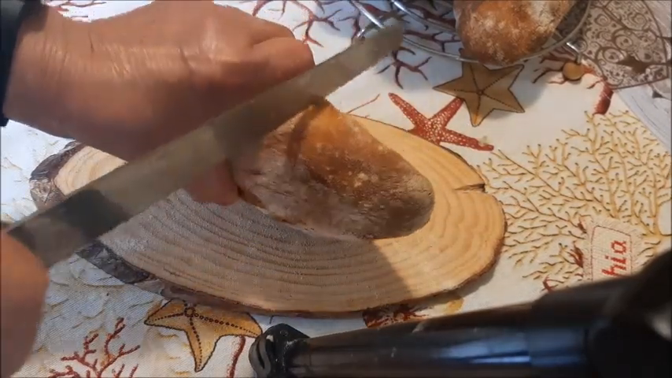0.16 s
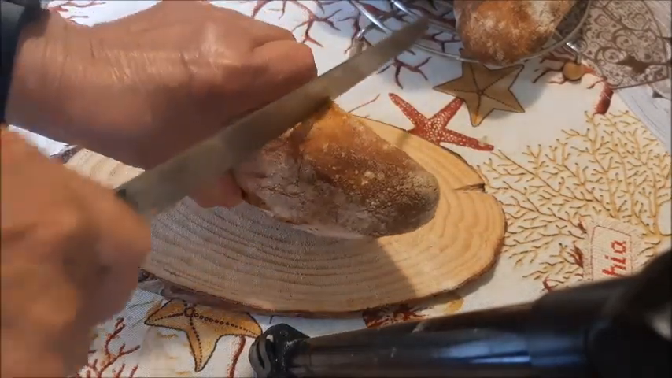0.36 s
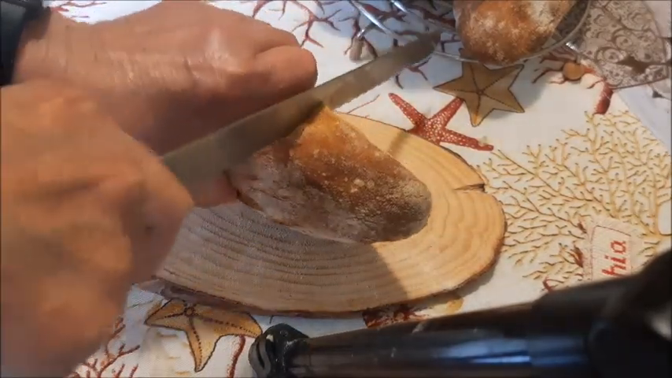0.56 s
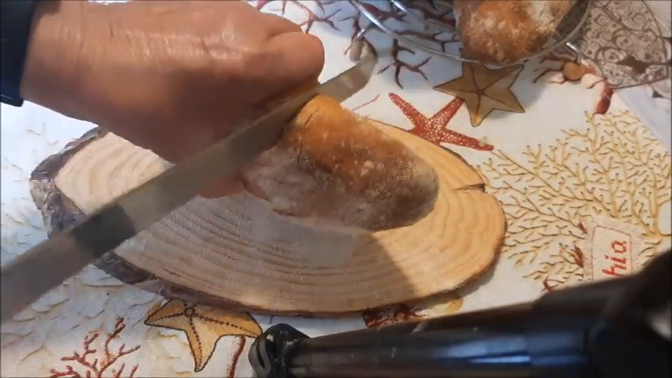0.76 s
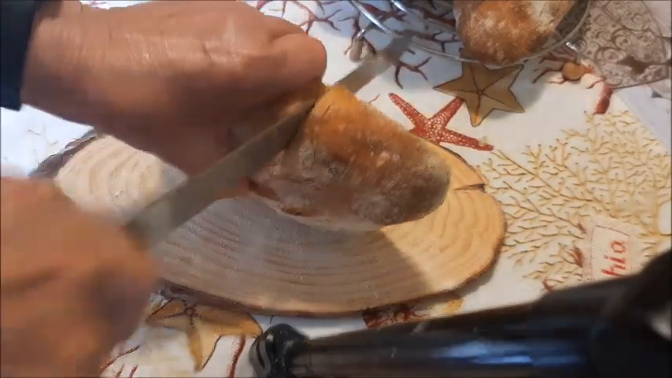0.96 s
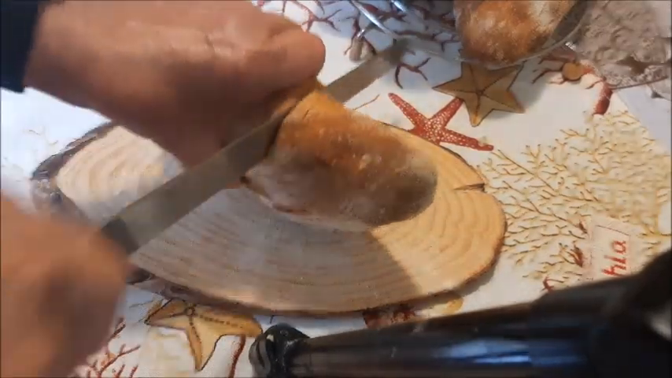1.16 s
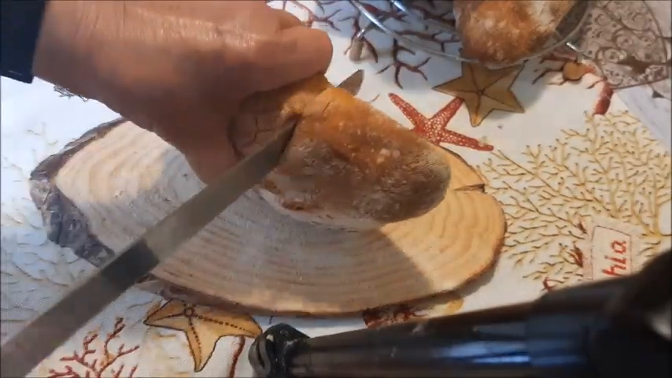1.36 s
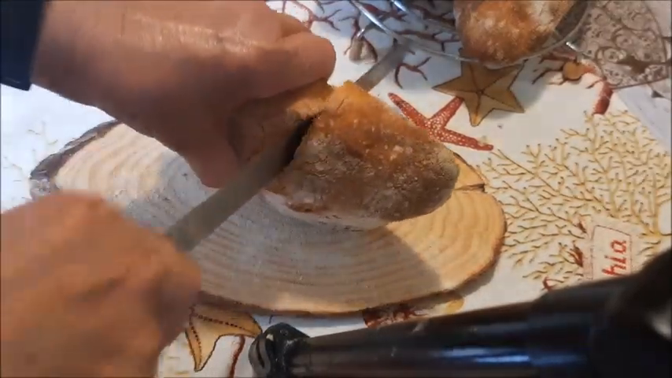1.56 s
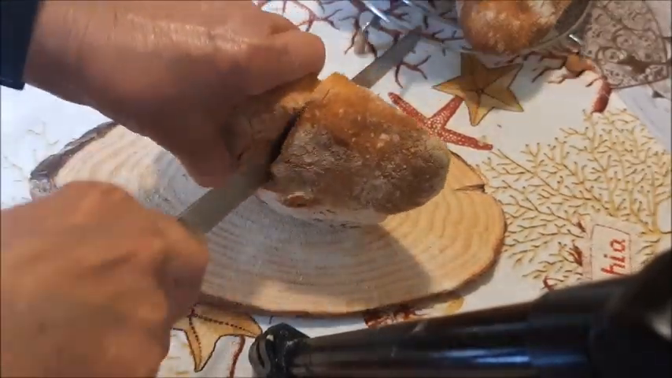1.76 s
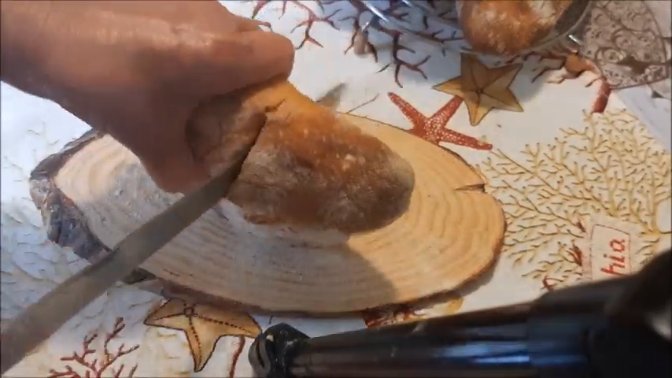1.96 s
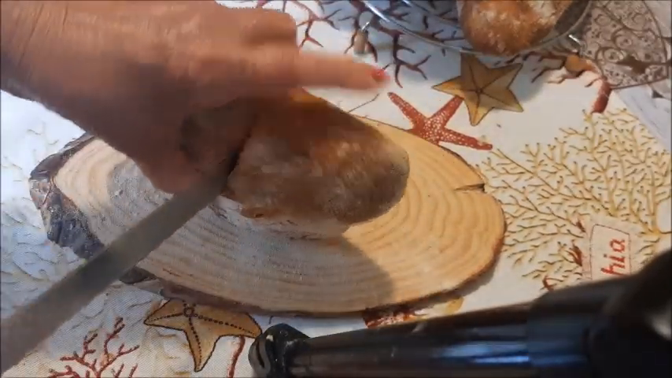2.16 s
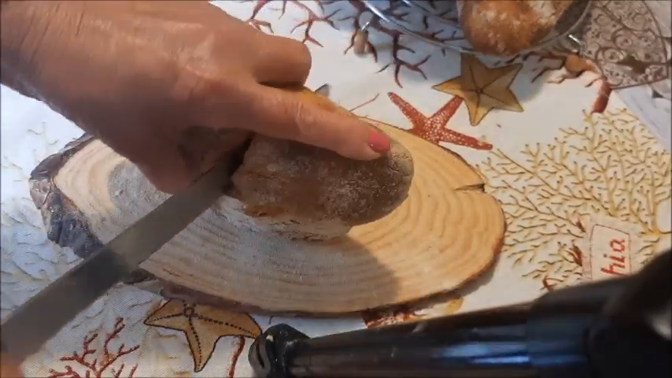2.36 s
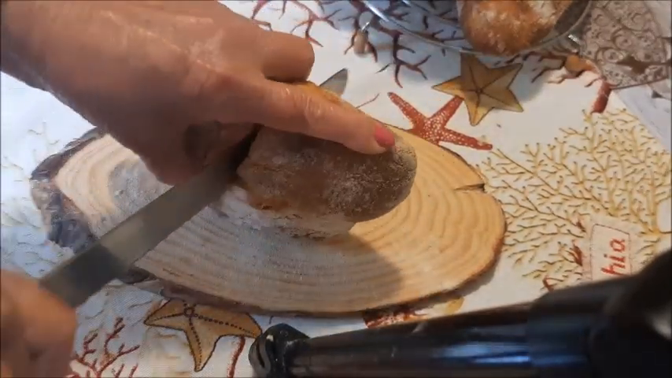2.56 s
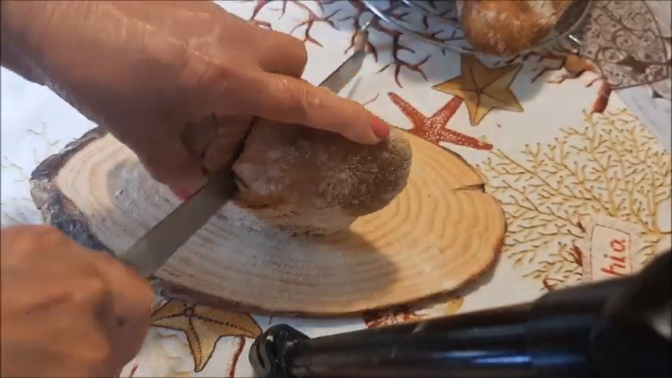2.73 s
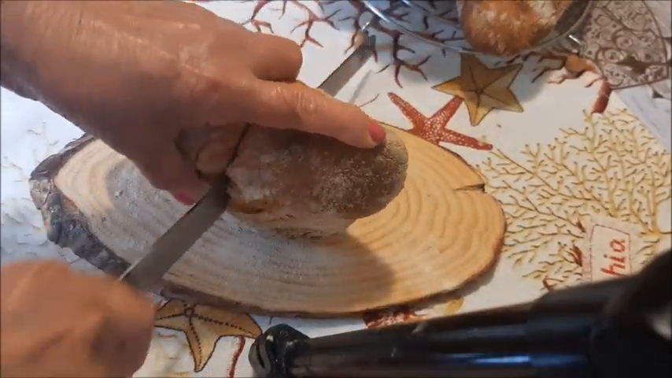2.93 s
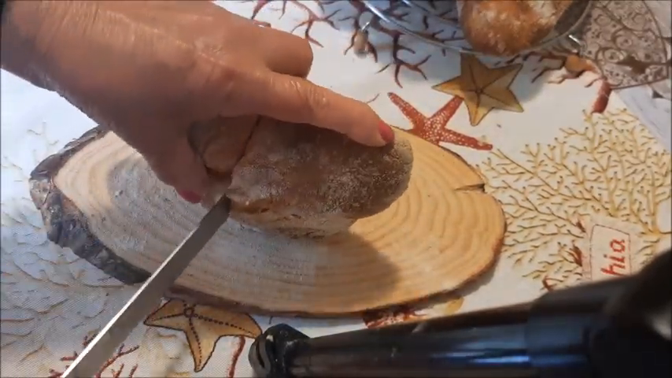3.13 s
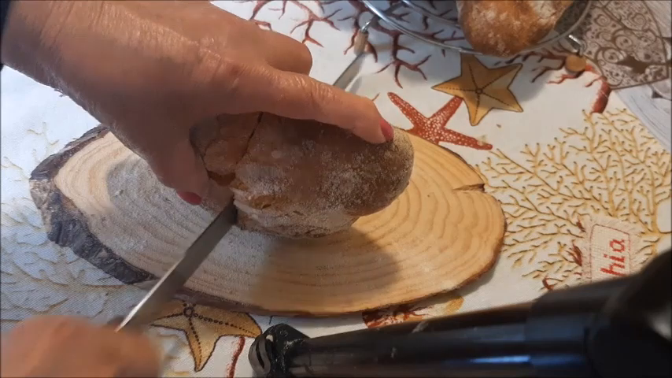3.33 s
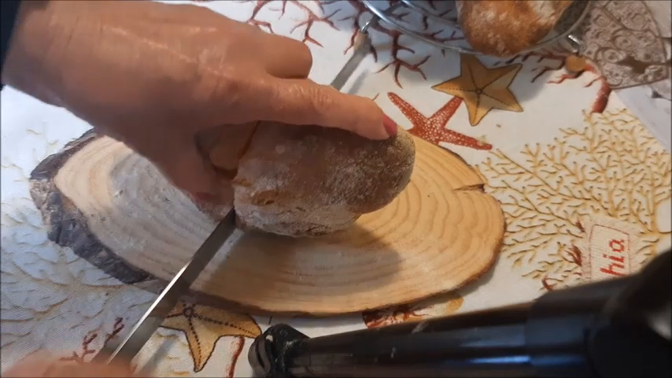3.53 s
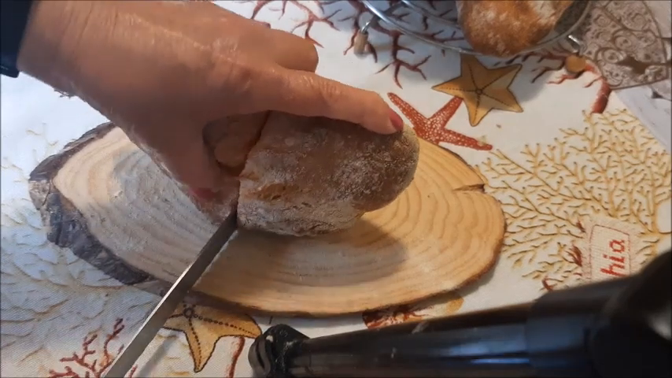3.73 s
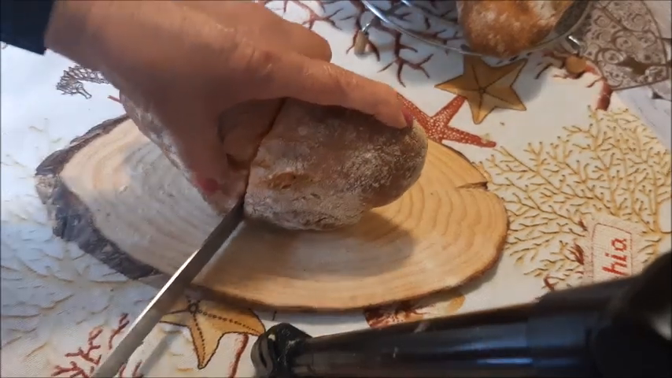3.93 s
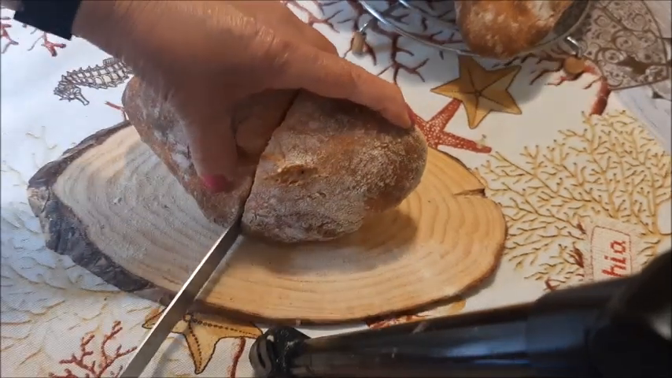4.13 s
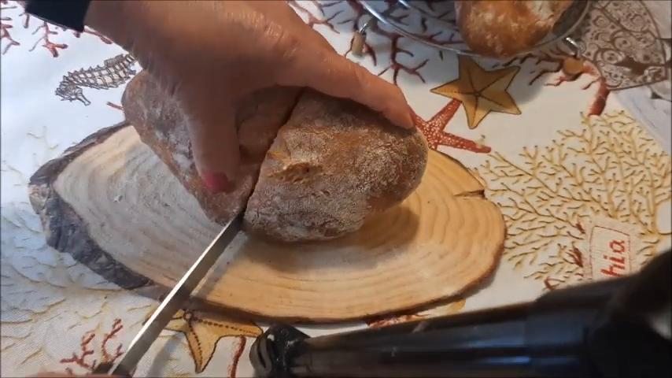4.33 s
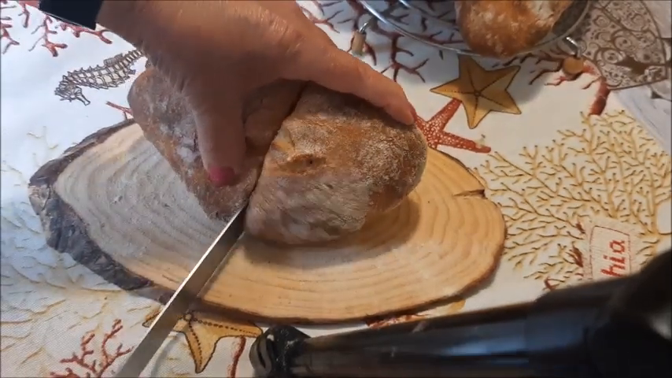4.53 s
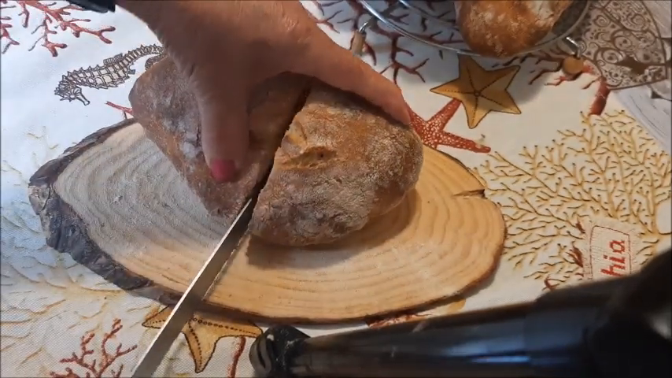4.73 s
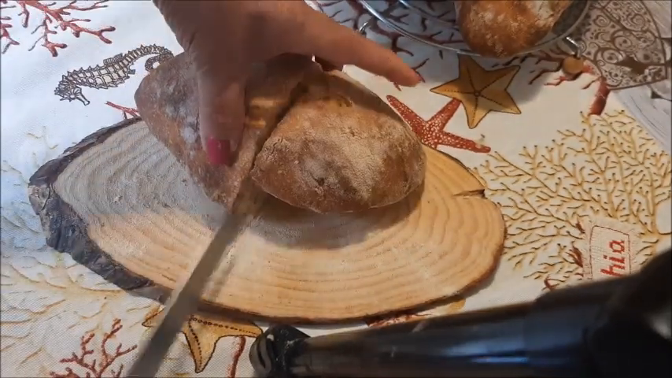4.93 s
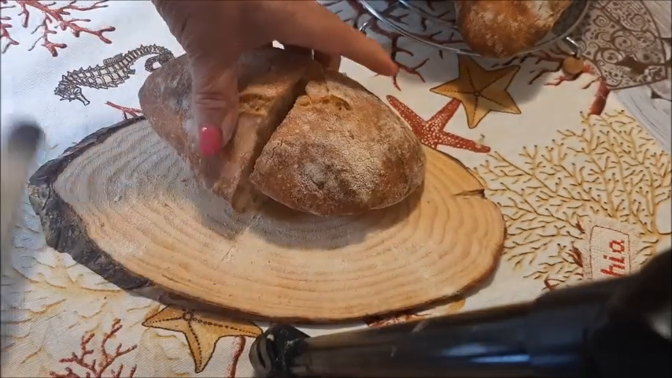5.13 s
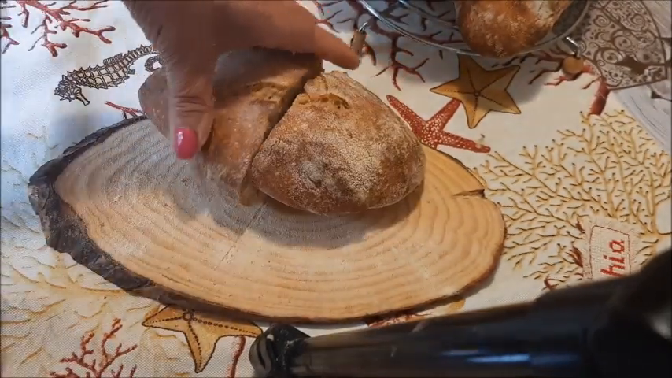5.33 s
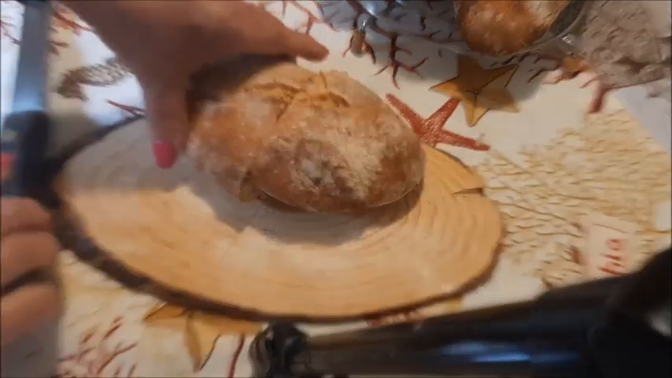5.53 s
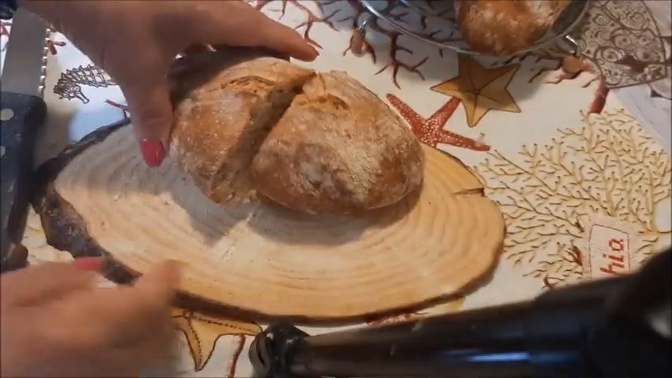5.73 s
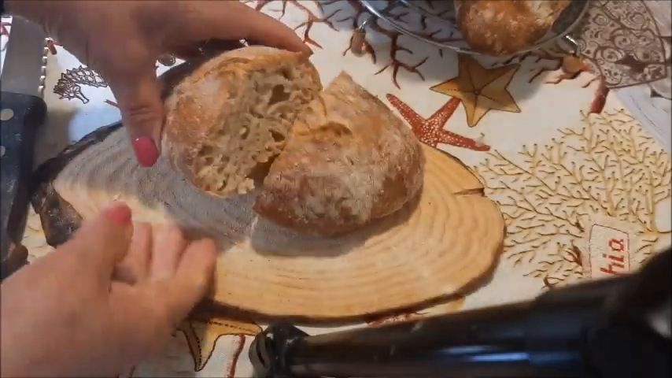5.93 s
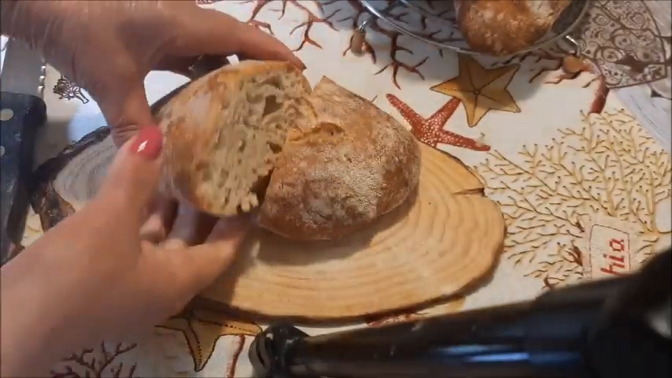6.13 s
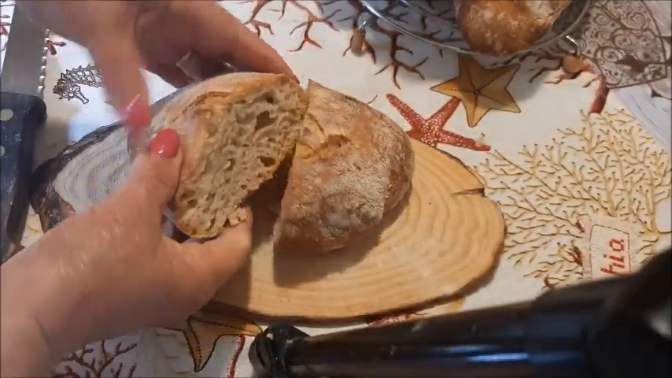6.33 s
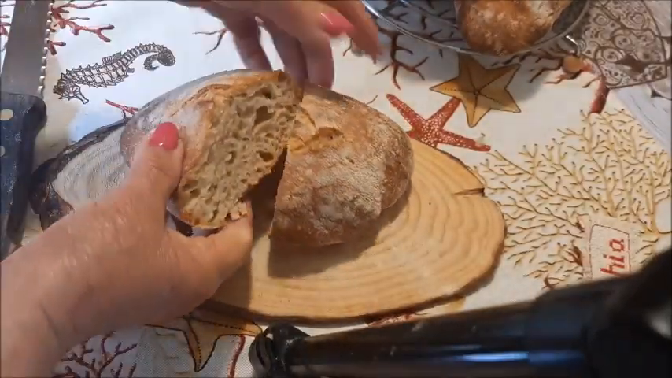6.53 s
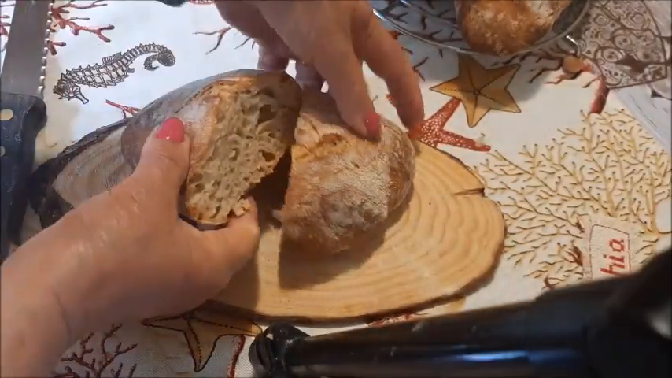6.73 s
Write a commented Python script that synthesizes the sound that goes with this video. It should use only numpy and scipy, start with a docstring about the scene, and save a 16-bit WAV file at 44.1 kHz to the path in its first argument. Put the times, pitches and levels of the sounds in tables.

```python
"""Close by in a kitchen, a serrated knife saws through a crusty roll on a wooden board.
Its teeth catch and crack the crust and shake loaf and board; the last strokes groan on the wood.
Fingers brush the bread, then the knife is put down on the cloth-covered table with a thud.
Last, the fingers turn the cut halves, rustling over the faint hush of the room."""
import sys
import numpy as np
from scipy import signal
from scipy.fft import rfft, irfft
from scipy.io import wavfile
from scipy.ndimage import uniform_filter1d

SR = 44100
rng = np.random.default_rng(int(sys.argv[2]) if len(sys.argv) > 2 else 0)


def wav_out(sig):
    """Save sig, one row per channel (or a flat mono array), as 16-bit PCM at SR to the path in sys.argv[1]."""
    wavfile.write(sys.argv[1], SR, np.round(np.clip(np.atleast_2d(sig).T, -1, 1) * 32767).astype(np.int16))


N = 298998

# large pieces of crust snapping: t/s, crack level/dB, knock level/dB
SNAPS = [(0.1786, -31, -46), (0.2342, -24.5, -39.5), (0.2687, -33, -42.5), (0.4581, -24.5, -45),
         (0.5298, -44, -33), (0.6484, -27, -52.5), (0.748, -17, -46), (0.7626, -33, -35),
         (0.7976, -31, -41), (0.9546, -27.5, -43), (1.0587, -23, -38), (1.1078, -25, -36.5),
         (1.1347, -21, -37.5), (1.2017, -33.5, -59), (1.314, -27, -45), (1.4627, -30, -43),
         (1.484, -16.5, -41.5), (1.51, -29, -35), (1.5301, -27.5, -36.5), (1.5787, -22.5, -36),
         (1.6578, -19, -53), (1.704, -32, -63), (1.7157, -11.5, -33.5), (1.8855, -23.5, -43),
         (2.1024, -39, -51), (2.37, -24, -42.5), (2.387, -31.5, -41), (2.4558, -32, -38),
         (2.474, -20.5, -37.5), (2.6217, -25, -45), (2.6357, -16.5, -37.5), (2.663, -26, -40.5),
         (2.6743, -18, -43), (2.7324, -32, -40), (2.7716, -23, -44), (2.7859, -27, -33.5),
         (2.835, -26, -34), (2.8631, -34, -38), (3.016, -30, -50.5), (3.4175, -31.5, -37),
         (3.4778, -26, -36), (3.57, -31, -58), (3.6206, -30, -42), (3.7004, -27, -52), (3.8899, -30.5, -46),
         (4.0921, -42, -51), (4.5819, -24.5, -36.5)]
# ringing notes of board and table: f/Hz, level/dB, time to fade by 60 dB/s
BOARD_NOTES = [(87, 8, 0.24), (106, 2, 0.53), (144.2, -5.5, 0.35), (182.5, 5.5, 0.09), (252, -6, 0.14),
               (285, -18.5, 0.059), (380, -6.5, 0.25), (571, -1.5, 0.092)]
# tone of the loaf's dull body: f/Hz, level/dB
LOAF_TONE = [(90, -27.5), (150, 0), (195, -3), (300, -0.5), (450, -2), (700, -5.5), (950, -13.5),
             (2000, -47.5)]
# tone of teeth rasping in the top crust: f/Hz, level/dB
RASP_TONE = [(300, -24), (650, 3), (900, -0.5), (1200, -1), (1600, 2), (2200, -1.5), (2800, -3),
             (3600, -11.5), (6000, -17), (16000, -39)]
# bright tone of breaking crust: f/Hz, level/dB
CRUST_TONE = [(600, -22), (1800, -3), (2800, -1), (4200, 1), (5500, -4), (7500, -2), (11000, 1.5),
              (13000, 5), (16000, 2.5)]


def amp(db):
    """Turn decibels into a gain to multiply by."""
    return 10 ** (np.asarray(db) / 20)


def unit(x):
    """Scale to energy 1."""
    return x / np.sqrt(np.sum(x ** 2, axis=-1, keepdims=True) + 1e-20)


def at_hz(points, hz):
    """Read between the rows of a table, with octaves evenly spaced."""
    f, value = np.transpose(points)
    return np.interp(np.log(np.maximum(hz, 1)), np.log(f), value)


def response(tone, size=4096):
    """What a click becomes when given this tone (a minimum-phase impulse response)."""
    gains = amp(at_hz(tone, np.arange(size // 2 + 1) * SR / size))
    cepstrum = irfft(np.log(gains))
    # folding the second half onto the first puts all the sound after the click
    cepstrum[1:size // 2] *= 2
    cepstrum[size // 2 + 1:] = 0
    return irfft(np.exp(rfft(cepstrum)))


def through(x, impulse):
    """Pass a sound through something whose answer to a click is known."""
    return signal.oaconvolve(x, impulse)[:N]


def colour(x, tone):
    """Give a sound a tone, using a filter of energy 1."""
    return through(x, unit(response(tone)))


def ringing(notes):
    """A struck object's answer to a click: fading sine waves of alternating sign."""
    t = np.arange(SR // 2) / SR
    return unit(sum((-1) ** k * amp(db - 60 * t / fade_s) * np.sin(2 * np.pi * hz * t)
                    for k, (hz, db, fade_s) in enumerate(notes)))


def even(x, span_s):
    """Hold the average level at 1 while keeping the fine roughness."""
    power = uniform_filter1d(x ** 2, size=max(int(span_s * SR), 2))
    power = uniform_filter1d(power, size=max(int(span_s * SR / 2), 2))
    return x / np.sqrt(np.maximum(power, 1e-12))


def grains(per_s, spread_db):
    """Random clicks, many small and a few large."""
    at = np.flatnonzero(rng.random(N) < per_s / SR)
    size, sign = rng.random((2, N))[:, at]
    clicks = np.zeros(N)
    clicks[at] = amp(spread_db * np.minimum(-np.log1p(-size), 4)) * np.sign(sign - .5)
    return clicks


def crumble(clicks, decay_s, share):
    """Each click sets off a short, fading shower of tiny ones."""
    decay = np.exp(-1 / (decay_s * SR))
    energy = signal.lfilter([1 - decay], [1, -decay], clicks ** 2 + 1e-18)
    return clicks + share * np.sqrt(energy) * even(grains(per_s=14000, spread_db=3.5), span_s=0.014)


def strikes(events):
    """One click for each row of time and level."""
    times, levels_db = np.transpose(events)
    clicks = np.zeros(N)
    clicks[np.round(times * SR).astype(int)] = amp(levels_db)
    return clicks


def glide(start, rise, fall):
    """Speed of one hand movement, 0-1: it speeds up from rest and slows to rest again."""
    roundness = 0.46  # 0 is a sharp jerk, 1 a smooth swing
    times = start + np.cumsum([0, rise, fall])
    first, last = np.clip((times[[0, 2]] * SR).astype(int), 0, N)
    ramp = np.interp(np.arange(first, last) / SR, times, [0, 1, 0])
    speed = np.zeros(N)
    speed[first:last] = ramp + roundness * (np.sin(np.pi / 2 * ramp) - ramp)
    return speed


def friction(moves, levels_db, power, lag_s=0):
    """Gain of the rubbing in a series of movements: it grows as speed raised to a power."""
    energy = np.zeros(N)
    for (start, rise, fall, *_), db in zip(moves, levels_db):
        energy += (amp(db) * glide(start + lag_s, rise, fall) ** power) ** 2
    return np.sqrt(energy)


def reflections(length_s, envelope, weight, count):
    """Stereo echoes of a click, made of noise bands that each fade in their own way."""
    # how alike the echo is left and right: f/Hz, likeness/0-1
    likeness = [(120, 1), (300, 0.82), (600, 0.26), (1200, 0.19), (16000, 0)]
    t = np.arange(int(SR * length_s)) / SR
    edges = np.geomspace(40, 19000, num=13)
    echo = 0
    for low, high in zip(edges, edges[1:]):
        hz = np.sqrt(low * high)
        alike = at_hz(likeness, hz)
        mid, side = rng.standard_normal((2, count, 1, len(t)))
        noise = np.sqrt(1 + alike) * mid + np.sqrt(1 - alike) * side * [[1], [-1]]
        bandpass = signal.butter(2, [low, high], "band", fs=SR, output="sos")
        band = signal.sosfilt(bandpass, noise * envelope(t, hz))
        echo = echo + np.sqrt(2 * (high - low) / SR) * weight(hz) * unit(band)
    return echo


def kitchen(x, near_db, room_db, pan_db, lead_ms):
    """A sound arrives directly, then bounces off board, hands and table, then echoes round the room."""
    # how long the room rings: f/Hz, time to fade by 60 dB/s
    room_fade = [(80, 0.28), (400, 0.49), (1500, 0.51), (4000, 0.53), (8000, 0.096), (16000, 0.13)]
    at = np.arange(N)
    right = np.interp(at - np.round(lead_ms * SR / 1000), at, x)
    out = np.array([x, right])
    # small surfaces scatter only the high notes
    paths = reflections(.02, envelope=lambda t, hz: np.exp(-t / 0.0027) * (t > .0003),
                        weight=lambda hz: hz / (hz + 900), count=4)
    # the hands keep moving, so the mix of these paths keeps changing
    knots = np.linspace(0, N, num=60)
    mix = np.array([np.interp(at, knots, rng.standard_normal(len(knots))) for _ in paths])
    mix /= np.sqrt(np.sum(mix ** 2, axis=0))
    for share, path in zip(mix, paths):
        out += amp(near_db) * signal.oaconvolve([share * x], path, axes=1)[:, :N]
    tail = reflections(.6, envelope=lambda t, hz: amp(-60 * t / at_hz(room_fade, hz)) * (t > .006),
                       weight=lambda hz: 1, count=1)[0]
    out += amp(room_db) * signal.fftconvolve([x], tail, axes=1)[:, :N]
    return out * amp(np.array([[.5], [-.5]]) * pan_db)


def air():
    """The faint steady hush of the room, partly shared by left and right."""
    # tone of the hush: f/Hz, level/dB
    hush_tone = [(25, -16), (100, 1), (180, -10.5), (400, -11.5), (700, -15.5), (1500, -18), (2800, -23.5),
                 (6000, -11.5), (8000, -16.5), (16000, -11)]
    shared, left, right = [colour(noise, hush_tone) for noise in rng.standard_normal((3, N))]
    return amp(-78) * (.7 * shared + 1.6 * np.array([left, right]))


def ticks():
    """Knife and crumbs make tiny contacts, short and dry."""
    # the contacts: t/s, level/dB
    contacts = [(4.969, -40.5), (5.021, -42), (5.372, -39.5), (5.4177, -31.5), (5.5328, -49), (5.814, -45),
                (5.841, -45), (6.015, -57), (6.132, -50), (6.684, -35)]
    # tone of a tick: f/Hz, level/dB
    tick_tone = [(200, -1), (700, 7.5), (2000, 2.5), (4000, -0.5), (6500, 2), (8000, -9.5), (16000, -25)]
    clicks = crumble(strikes(contacts), decay_s=.0008, share=0.3)
    return amp(-4.5) * colour(clicks, tick_tone)


def fingers():
    """Skin brushes the floury crust and the halves nudge the board, with a few ticks among them."""
    # finger movements: start/s, swelling/s, fading/s, rustle level/dB, extra for the bump/dB
    touches = [(4.86, 0.041, 0.036, -66, 2.5), (4.93, 0.028, .14, -69, 3), (5.32, 0.051, 0.065, -72, 2.5),
               (5.411, .008, .03, -68, 7.5), (5.42, 0.035, 0.058, -63.5, -6), (5.87, 0.09, 0.11, -74, -1),
               (5.98, 0.044, 0.11, -67, -22), (6.1, 0.048, 0.2, -65.5, -10), (6.26, .08, 0.098, -73, -11.5),
               (6.4, 0.073, 0.12, -65, -9.5), (6.555, 0.043, 0.097, -68.5, 7.5),
               (6.66, 0.026, 0.075, -67, 0.5)]
    # tone of skin on crust: f/Hz, level/dB
    rustle_tone = [(200, -10.5), (600, 0.5), (1100, 3), (2200, 0.5), (3300, -5.5), (5000, -8),
                   (7500, -13.5), (12000, -17.5), (16000, -11)]
    *_, rustle_db, bump_db = np.transpose(touches)
    rubbing = even(grains(per_s=2000, spread_db=4), span_s=0.097)
    rustle = friction(touches, rustle_db, power=1.42) * colour(rubbing, rustle_tone)
    shaking = through(rubbing, ringing(BOARD_NOTES)) + 2 * colour(rubbing, LOAF_TONE)
    bump = friction(touches, rustle_db + bump_db, power=1.42) * even(shaking, span_s=.06)
    return kitchen(amp(-2) * (rustle + bump) + ticks(), near_db=4.5, room_db=-3, pan_db=3.5, lead_ms=0)


def knife_down():
    """The handle thuds through the tablecloth; the table rings and the room answers."""
    # the knife lands and rocks to rest: t/s, level/dB
    landing = [(5.519, -19.5), (5.5319, 0), (5.5382, -26), (5.548, -20), (5.5617, -18), (5.581, -11.5),
               (5.593, -12), (5.659, -17.5), (5.697, -19.5)]
    # tone of the thud: f/Hz, level/dB
    thud_tone = [(30, -33), (60, -8), (90, 3), (190, -1.5), (380, -5), (600, -2), (850, -1), (1200, -10),
                 (1650, -9), (2200, -16), (3000, -31.5), (4200, -36.5), (7000, -43.5), (16000, -42)]
    # ringing notes of the struck table: f/Hz, level/dB, time to fade by 60 dB/s
    table_notes = [(86, -2, .42), (110, -5, .4), (140, -9, .35), (253, -5, .45), (365, -6, .42),
                   (393, -9, .4), (565, -4, .3), (640, -5, .3), (711, -2, .32), (807, -6, .42),
                   (1001, -10, .45), (1281, -11, .32), (1453, -8, .25), (1577, 1, .3), (2040, -11, .3),
                   (2169, -15, .28)]
    blows = crumble(strikes(landing), decay_s=0.009, share=0.33)
    thud = colour(blows, thud_tone) + amp(-10.5) * through(blows, ringing(table_notes))
    return kitchen(thud, near_db=7, room_db=5.5, pan_db=2.0, lead_ms=-0.29)


def slips():
    """Surfaces that stick and slip give short, unsteady tones that sag as the movement ends."""
    # the blade groans on the board, and later a finger squeaks faintly:
    # start/s, swelling/s, fading/s, first f/Hz, last f/Hz, level/dB
    slides = [(4.375, .04, 0.06, 218.4, 190, -38), (4.571, .03, 0.091, 258, 201.5, -32),
              (4.65, 0.032, 0.078, 245.8, 238, -43), (6.25, .1, 0.2, 2880, 2830, -73)]
    t = np.arange(N) / SR
    wander = even(through(rng.standard_normal(N), np.hanning(SR // 50)), span_s=.2)
    tones = np.zeros(N)
    for start, rise, fall, first_hz, last_hz, db in slides:
        pitch = np.interp(t, [start, start + rise + fall], [first_hz, last_hz])
        pitch += .5 * np.sqrt(first_hz) * wander
        gain = amp(db) * glide(start, rise, fall) ** 1.7
        tones += gain * np.sin(2 * np.pi * np.cumsum(pitch) / SR)
    return tones


def chips(crackle_gain):
    """Small bits of crust break off at random, loudest while the teeth bite hardest."""
    bite = (crackle_gain / crackle_gain.max()) ** 0.75
    breaks = crumble(bite * grains(per_s=40, spread_db=3.5), decay_s=0.0013, share=1.0)
    return amp(-35) * colour(breaks, CRUST_TONE) + amp(-34.5) * colour(breaks, RASP_TONE)


def snaps():
    """A piece of crust gives way: a sharp crack, a shower of crumbs and a knock through the loaf."""
    crumbling_s = .0013
    t = np.arange(SR // 20) / SR
    click = t == 0
    cracks, pushes = np.zeros((2, N + len(t)))
    for start, crack_db, knock_db in SNAPS:
        crumbs = unit(rng.laplace(size=len(t)) * np.exp(-t / crumbling_s))
        at = round(start * SR)
        cracks[at:at + len(t)] += amp(crack_db) * (click + 1.6 * crumbs)
        pushes[at:at + len(t)] += amp(knock_db) * (click + 0.22 * crumbs)
    crack = amp(1.5) * colour(cracks, CRUST_TONE)
    knock = amp(20) * colour(pushes, RASP_TONE) + amp(16.5) * colour(pushes, LOAF_TONE)
    return kitchen(crack + knock, near_db=5.0, room_db=-2.5, pan_db=2.5, lead_ms=.12)


def sticking(hold_s, dip_db):
    """The level dips just before each snap, as the blade stalls and the crust bends."""
    stall = np.zeros(N)
    for snap_s, *_ in SNAPS:
        stall[round((snap_s - hold_s) * SR):round(snap_s * SR)] = 1
    return 1 - (1 - amp(dip_db)) * uniform_filter1d(stall, size=60)


def strokes():
    """Gains of board rumble, loaf body, tooth rasp and crust crackle as the blade goes to and fro."""
    # saw strokes: start/s, speeding up/s, slowing down/s, force/dB,
    # extra weight on the board/dB, extra crust caught/dB
    moves = [(0.0, 0.06, 0.045, -51, -7, -5), (0.164, 0.029, 0.043, -47, -7.5, -9),
             (0.205, 0.094, 0.4, -50.5, -1.5, -4), (0.39, 0.12, .14, -46.5, -1, -0.5),
             (0.65, 0.11, 0.14, -45, 6.5, -3), (0.905, 0.1, 0.21, -40, 2, -4.5),
             (1.179, .12, 0.13, -43, 2, -5), (1.435, 0.16, 0.39, -41.5, -1.5, 0.5),
             (1.841, 0.057, 0.071, -44, -10, -4.5), (1.958, 0.069, 0.16, -52, -4.5, -4),
             (2.318, .17, 0.2, -47, 0.5, -2.5), (2.589, 0.076, 0.054, -45, -1, 2),
             (2.679, 0.13, .19, -46.5, 5.5, 2), (2.99, 0.092, .16, -50, -2, -4.5),
             (3.245, 0.14, 0.22, -41.5, 0.5, -8.5), (3.539, 0.19, 0.089, -40.5, -4.5, -11),
             (3.78, .14, 0.13, -51.5, -4, -14), (4.074, 0.051, 0.15, -49, -12.5, -8),
             (4.283, 0.097, .12, -45, -1, -20), (4.462, 0.16, 0.14, -39.5, -10, -14)]
    *_, force, weight, caught = np.transpose(moves)
    # the crust bites first; loaf and board follow
    crackle = friction(moves, force + caught - 2.5, power=1.14, lag_s=-0.0097)
    rasp = friction(moves, force - 2, power=1.66)
    body = friction(moves, force + 0.58 * weight + .3, power=1.34, lag_s=.004)
    rumble = friction(moves, force + weight - .5, power=1.38, lag_s=0.02)
    # until the cut ends, the wedged blade rubs faintly even between strokes
    cut_end_s = 4.72
    wedged = amp(-72.5) * (np.arange(N) / SR < cut_end_s)
    return rumble, body + amp(-10) * wedged, rasp + amp(-4) * wedged, crackle + amp(-5.5) * wedged


def board_and_loaf(tearing, rumble_gain, body_gain):
    """The tearing shakes the board into a low rumble and the loaf into a dull murmur."""
    # tone of the board's rumble: f/Hz, level/dB
    rumble_tone = [(25, -47.5), (45, -20.5), (62, -3), (85, -4.5), (150, 11), (200, -27), (400, -48.5)]
    shaking = tearing + amp(-14) * through(tearing, ringing(BOARD_NOTES))
    rumble = rumble_gain * even(through(shaking, response(rumble_tone)), span_s=0.072)
    body = body_gain * even(through(shaking, response(LOAF_TONE)), span_s=0.11)
    return rumble + body


def tooth_rasp(tearing, depth):
    """The teeth scrape; deeper down, the soft bread dulls them and the gripped blade rings along."""
    # ringing notes of the gripped blade: f/Hz, level/dB, time to fade by 60 dB/s
    blade_notes = [(1187, -17.5, 0.025), (1446, 2.5, 0.028), (2110, -5.5, 0.19), (2620, -16, 0.0234),
                   (3970, -12.5, 0.048)]
    # tone of the rasp deep in the loaf: f/Hz, level/dB
    deep_tone = [(300, -7.5), (650, 1.5), (1000, 3), (1300, -1), (1600, -4.5), (2100, -5.5), (2600, -12.5),
                 (3600, -19), (6000, -29.5), (16000, -44.5)]
    blade = tearing + amp(-20) * through(tearing, ringing(blade_notes))
    scrape = (1 - depth) * colour(tearing, RASP_TONE) + depth * colour(blade, deep_tone)
    return even(scrape, span_s=0.087)


def crust_crackle(catches, depth):
    """Fine flakes break off under the teeth, bright on top and muffled deeper down."""
    flakes = crumble(catches, decay_s=0.00046, share=0.91)
    flakes += amp(-5.5) * even(grains(per_s=840, spread_db=4), span_s=0.054)
    bright = colour(flakes, CRUST_TONE)
    muffled = signal.sosfilt(signal.butter(1, 5000, fs=SR, output="sos"), bright)
    return even((1 - depth) * bright + depth * muffled, span_s=0.017)


def sawing():
    """Teeth catch in the crust; each catch shakes board, loaf and blade and sheds fine crackle."""
    # how far the blade has sunk from the top crust towards the board: t/s, depth/0-1
    sinking = [(0, 0.09), (1.2, 0.2), (1.7, 0.07), (2.7, 0.25), (3.3, 0.94), (4.1, 0.71), (4.7, 0.81)]
    depth = np.interp(np.arange(N) / SR, *np.transpose(sinking))
    rumble_gain, body_gain, rasp_gain, crackle_gain = strokes()
    catches = even(grains(per_s=300, spread_db=2.0), span_s=0.016)
    tearing = crumble(catches, decay_s=0.0022, share=0.48) + amp(-8) * rng.standard_normal(N)
    low = board_and_loaf(tearing, rumble_gain, body_gain)
    teeth = rasp_gain * tooth_rasp(tearing, depth)
    crust = crackle_gain * crust_crackle(catches, depth) + chips(crackle_gain)
    moving = sticking(hold_s=0.015, dip_db=-1.0)
    return (kitchen(low + slips(), near_db=-7.5, room_db=-8.5, pan_db=2.5, lead_ms=.1)
            + kitchen(teeth * moving, near_db=4.5, room_db=-9.5, pan_db=2.5, lead_ms=.13)
            + kitchen(crust * moving, near_db=4.5, room_db=-2, pan_db=1.8, lead_ms=.13))


def scene():
    """The crust is sawn and snaps, the knife is put down and the halves are turned."""
    return sawing() + snaps() + knife_down() + fingers() + air()


def record(dry):
    """The microphone's openings put a dip in the treble, and the very highest sounds are cut."""
    # tone of the openings: f/Hz, level/dB
    opening_tone = [(30, -0.5), (7400, 2), (8100, -8.5), (8700, -16), (9600, -10), (11500, -3),
                    (16000, -5.5)]
    cutoff_hz = 16100
    coloured = np.array([through(channel, response(opening_tone)) for channel in dry])
    return signal.sosfilt(signal.ellip(10, .3, 70, cutoff_hz, fs=SR, output="sos"), coloured)


dry = scene()
out = record(dry)
wav_out(out)
```